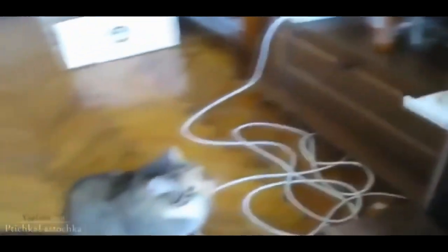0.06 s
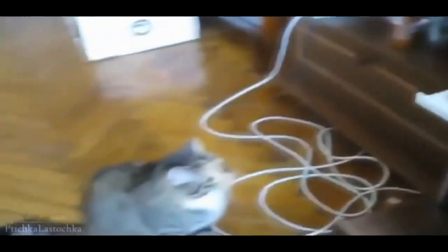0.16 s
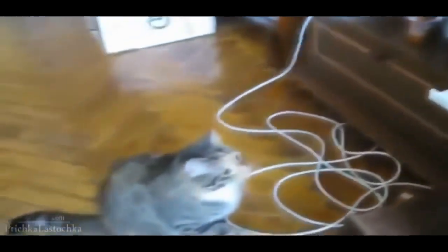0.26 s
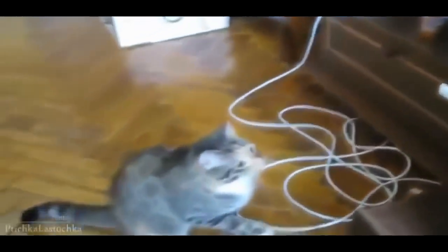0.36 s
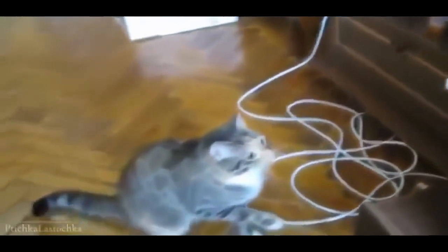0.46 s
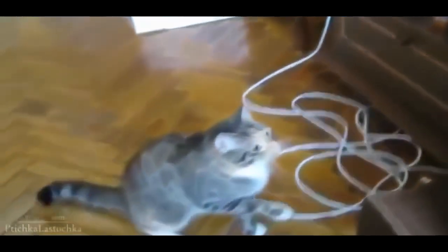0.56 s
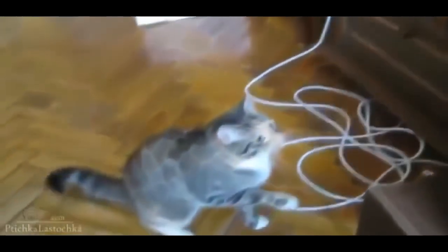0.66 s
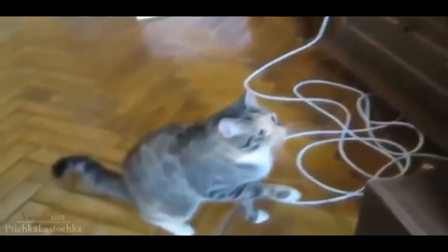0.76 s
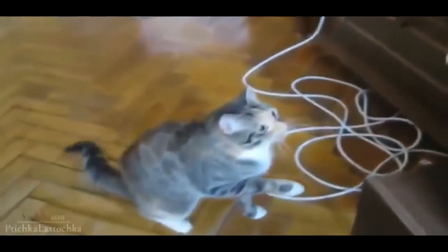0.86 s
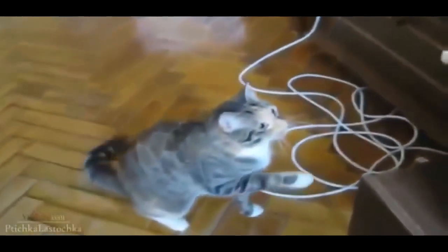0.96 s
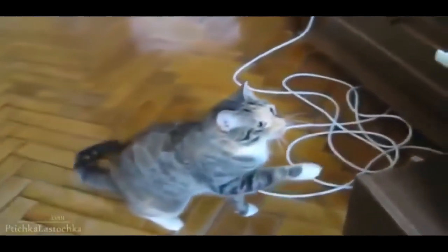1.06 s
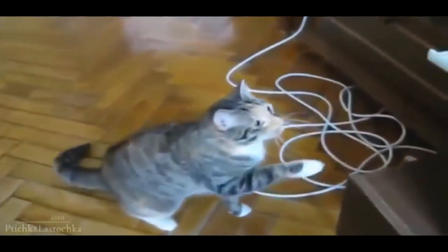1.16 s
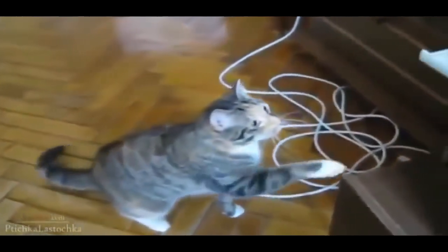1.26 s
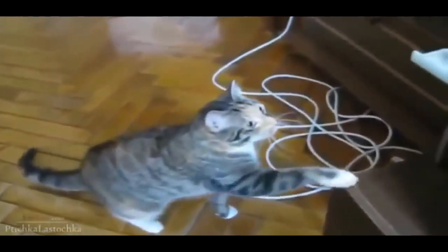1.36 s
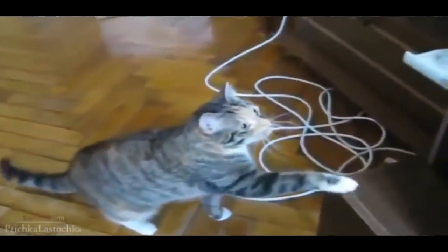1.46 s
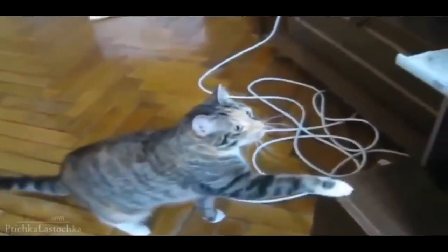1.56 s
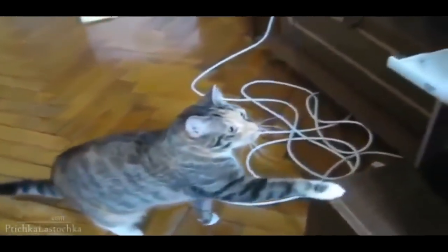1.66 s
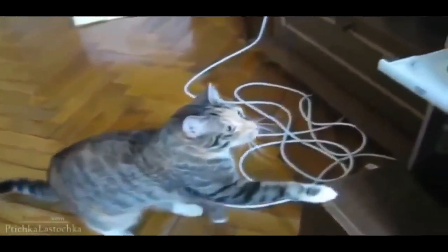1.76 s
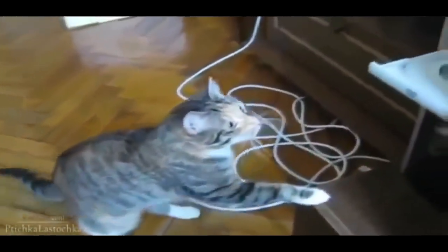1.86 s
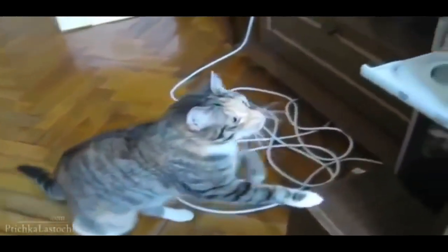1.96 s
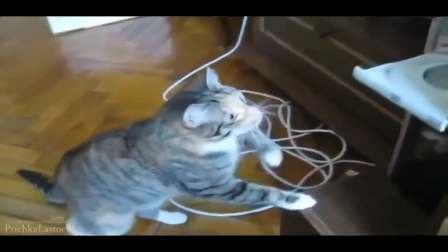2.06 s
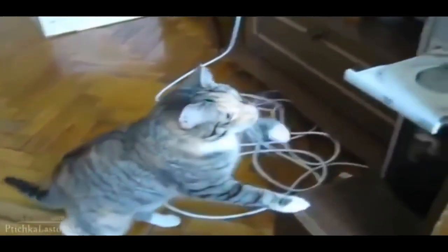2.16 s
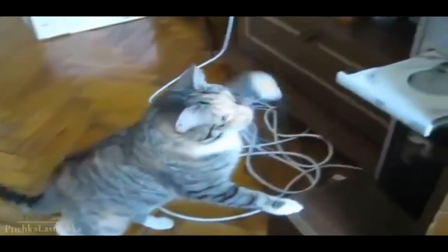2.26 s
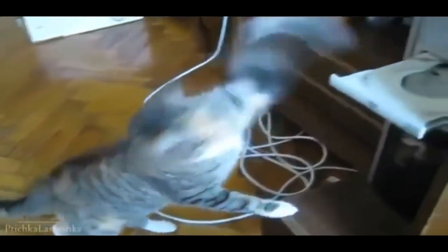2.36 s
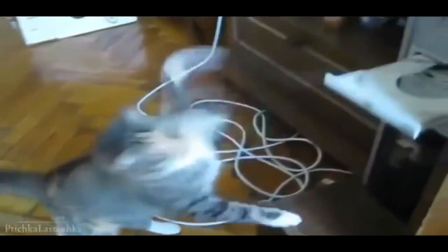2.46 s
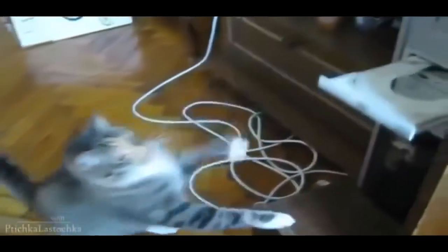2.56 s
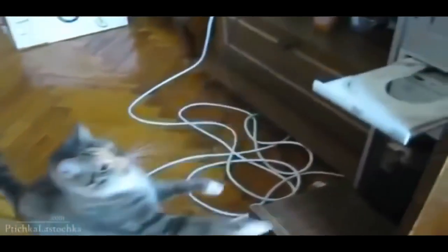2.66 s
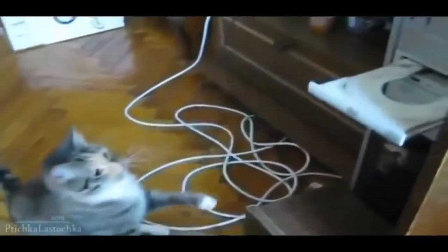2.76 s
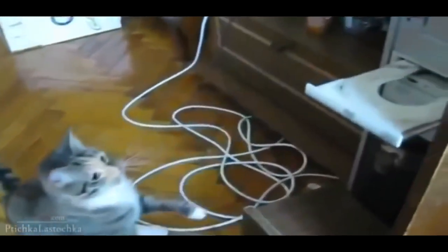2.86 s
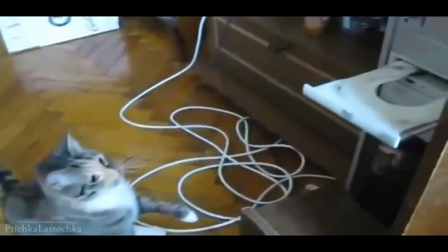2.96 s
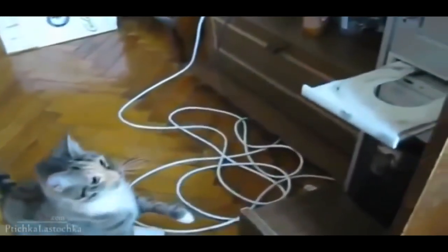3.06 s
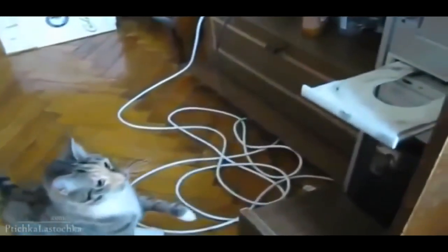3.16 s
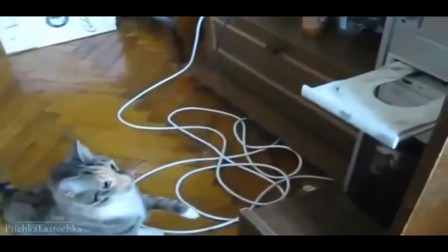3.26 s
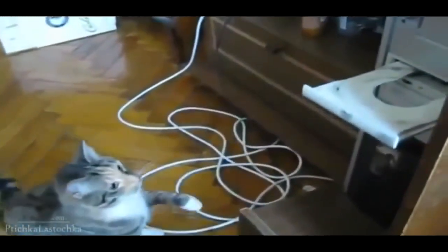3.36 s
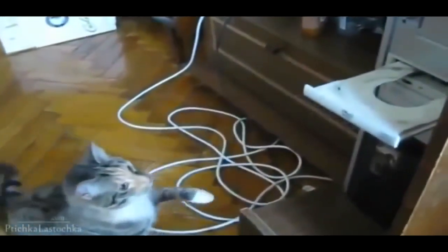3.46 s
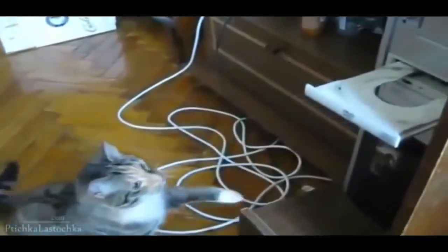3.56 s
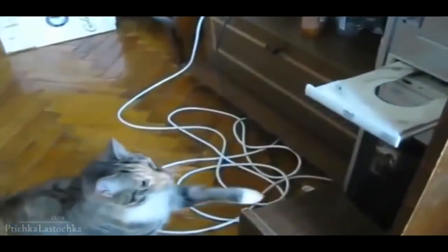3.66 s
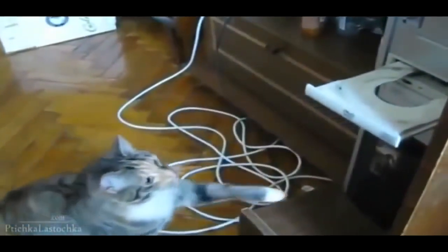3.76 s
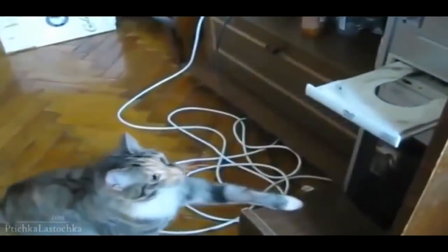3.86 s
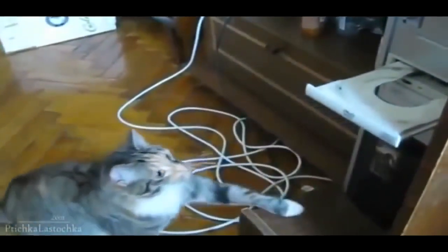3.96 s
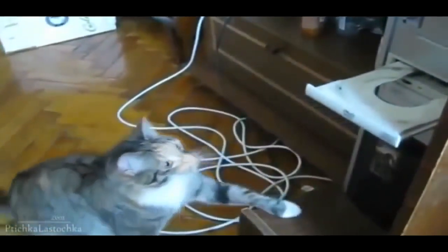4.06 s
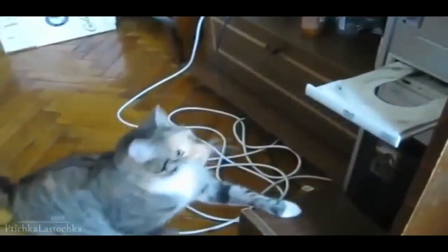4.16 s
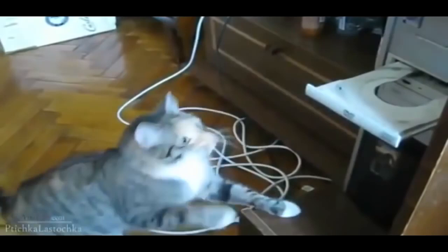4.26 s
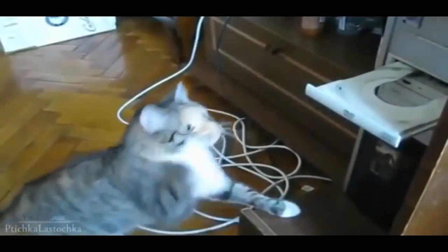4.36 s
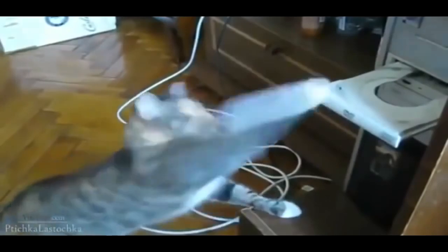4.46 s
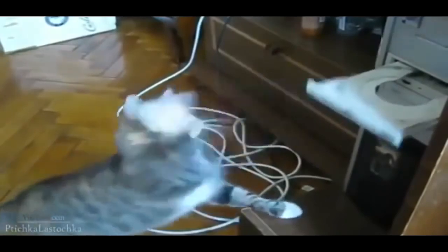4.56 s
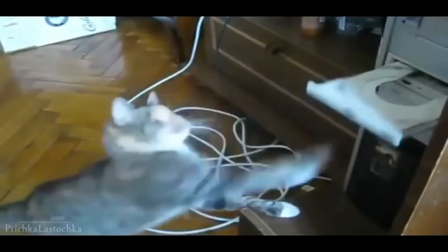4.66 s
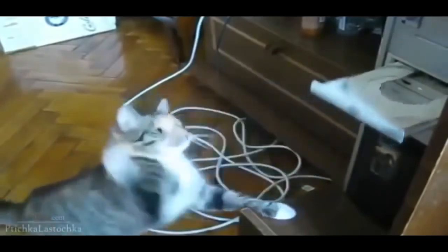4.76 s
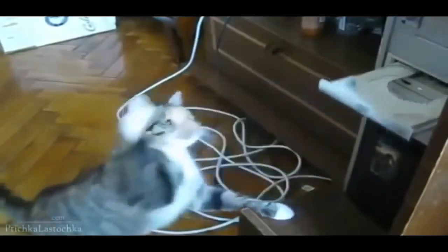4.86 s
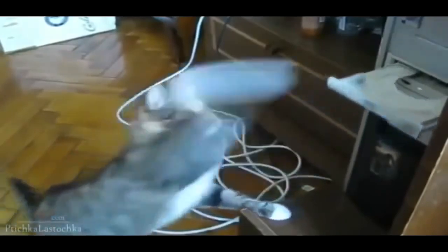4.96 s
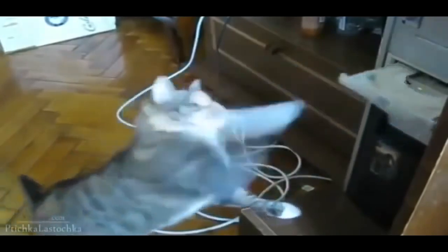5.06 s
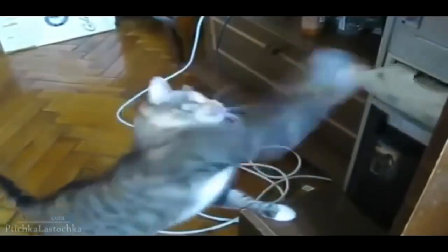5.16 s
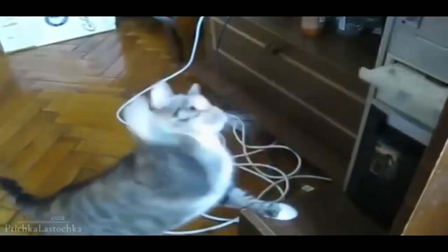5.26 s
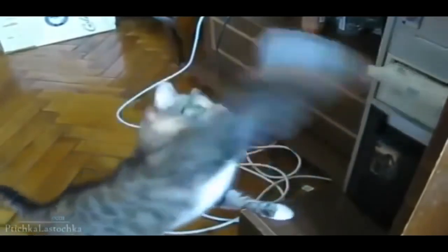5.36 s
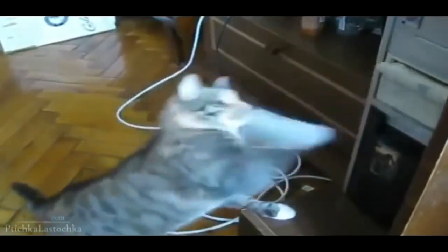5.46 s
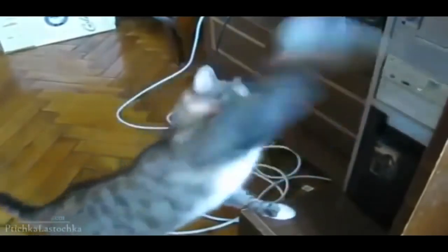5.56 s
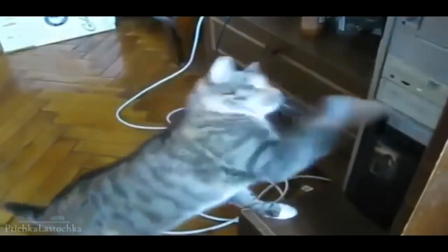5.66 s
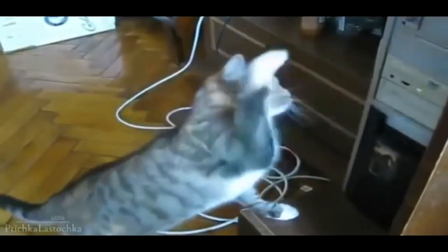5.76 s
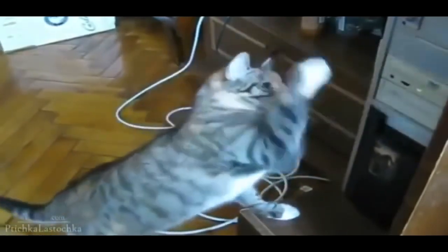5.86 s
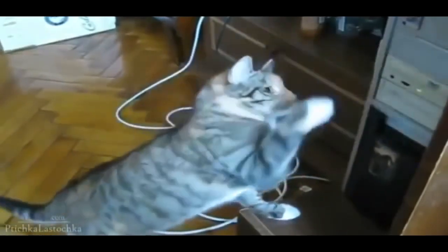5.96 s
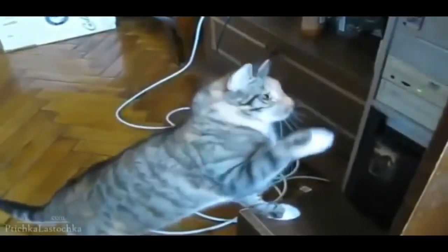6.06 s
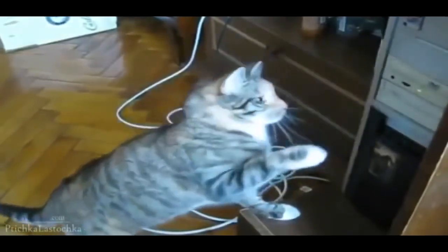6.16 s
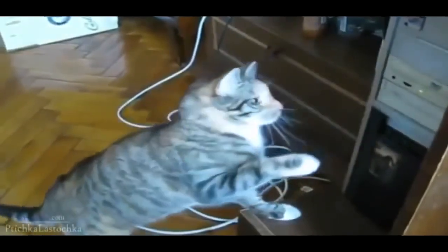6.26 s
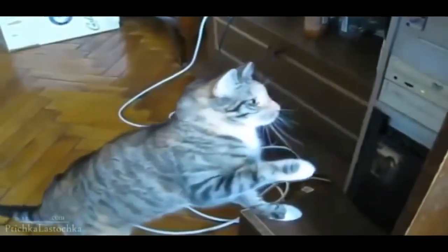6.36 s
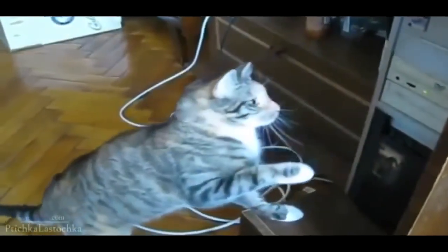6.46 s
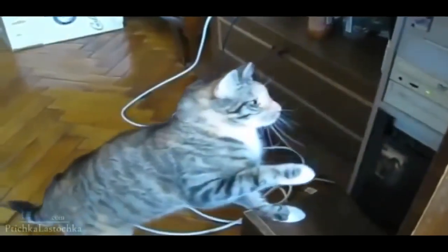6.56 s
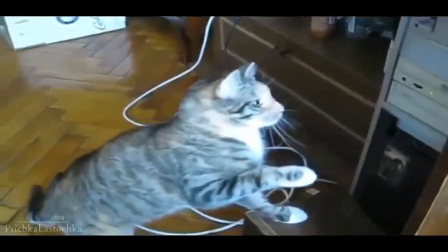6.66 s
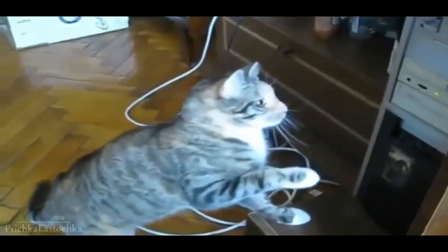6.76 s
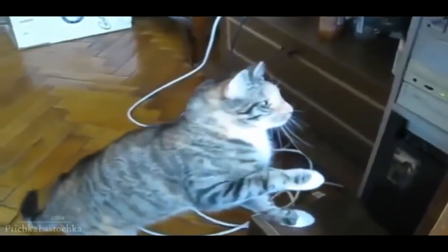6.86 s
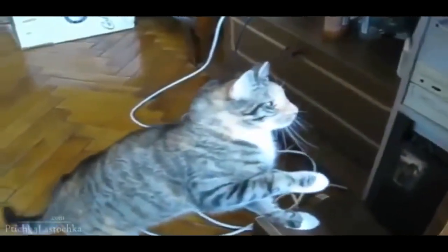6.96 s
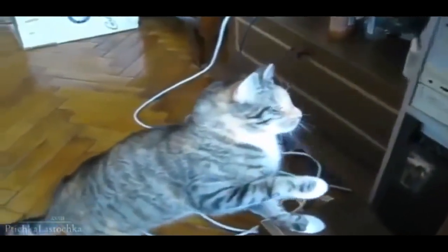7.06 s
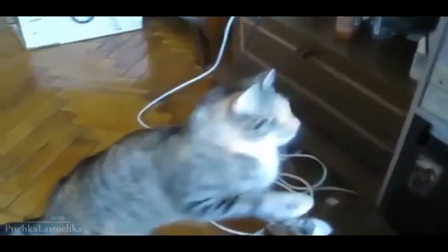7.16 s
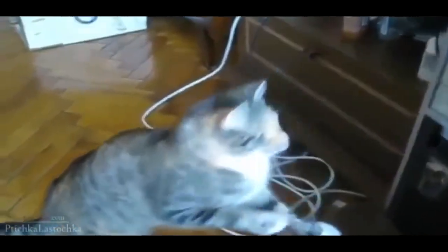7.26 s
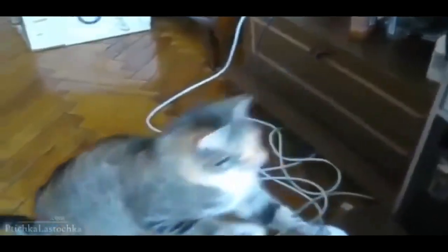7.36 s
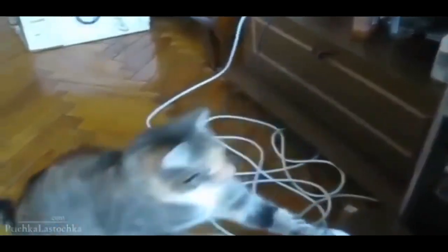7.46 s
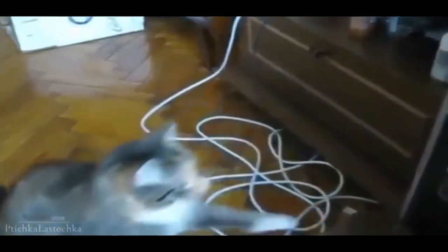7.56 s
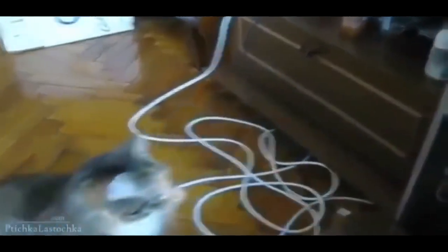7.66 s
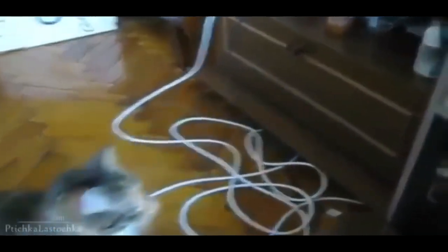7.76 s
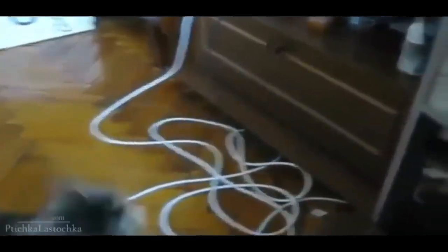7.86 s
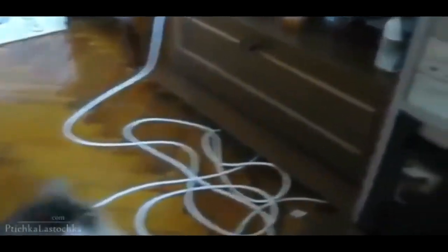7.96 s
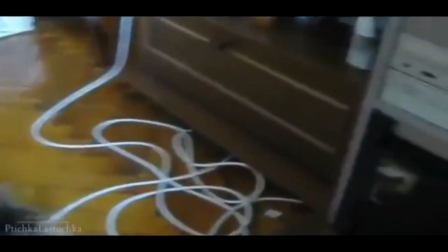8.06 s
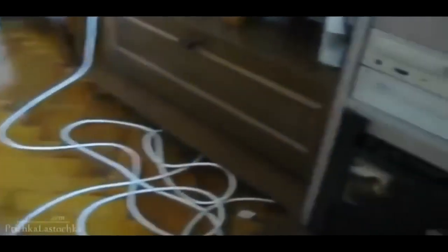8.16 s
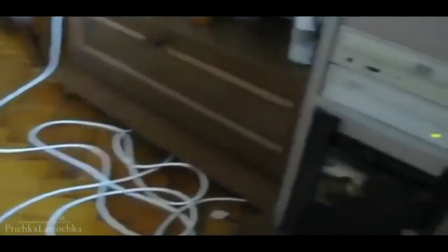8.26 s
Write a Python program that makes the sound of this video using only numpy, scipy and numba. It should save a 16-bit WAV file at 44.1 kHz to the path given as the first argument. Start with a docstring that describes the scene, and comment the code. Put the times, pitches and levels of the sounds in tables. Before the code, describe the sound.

A small room with a hard floor, heard through one limited camera microphone with slight hiss. From 0 to 0.5 s a disc-tray motor scrapes and whines, one tone sinking while another climbs, then stops. Steady computer fan hum with airy, hollow, wavering tones continues alone. At 2.8 s a hard, bright plastic clack rings out, with a low floor rumble dying away and softer taps and tiny rattles until about 3.25 s. Quiet hum again, with a small electric pop at 4.64 s. From 4.88 to 6.0 s a cat's blows batter the tray: sharp cracks at 4.88, 5.02, 5.4, 5.57, 5.79 and 5.99 s, loose rattling between them, the last duller. Grainy, roomy noise swells after the hard hits, which overload slightly. Then the fan hum returns with a changed, quieter tone; very faint ticks come near 7 and 7.7 s, and the motor scrape gently rises until 8.3 s.

```python
"""Cat and disc-drive tray

A small hard-floored room, one camera microphone. A cat swats the plastic tray of a computer's disc drive:
damped modes ring and loose contacts rattle. Grainy swells of noise follow the hard blows, mostly the room's
echo coming back as the camera's limiter releases. Filtered noise and blade tones make the fans' steady hum;
the tray motor scrapes and whines at first and stirs at the end. An electric pop crosses the line.
The camera's slow converter leaves a faint mirror of the sound above half its sampling rate."""
import sys
import numpy as np
from scipy import signal
from scipy.fft import rfft, irfft, next_fast_len
from scipy.io import wavfile
from scipy.ndimage import uniform_filter1d, map_coordinates
from numba import njit

SR = 44100
rng = np.random.default_rng(int(sys.argv[2]) if len(sys.argv) > 2 else 0)


def makeup_ratio(level_db):
    """Linear amplitude ratio for a level in decibels (20 dB per factor of ten)."""
    decades = np.asarray(level_db, float) / 20
    return 10 ** decades


def persist_wave(psi):
    """Save psi, clipped to +-1, as 16-bit WAV."""
    counts = np.round(np.clip(psi, -1, 1) * 32767).astype(np.int16)
    wavfile.write(sys.argv[1], SR, np.atleast_2d(counts).T)


N = 366471  # samples

# Source levels are ahead of the microphone and limiter; relative_db is shifted or normalised further on.
# tray motor and gears, running out, then stirring at the end: start_s, level_db (rms)
MOTOR_LEVEL = [(0, -38.5), (.2, -43), (.48, -41.5), (.52, -49), (1, -66.5), (7.3, -57), (8.31, -48)]
# colour of the gear scrape: frequency_hz, relative_db (per Hz)
GEAR_COLOUR = [(150, -36), (500, 7.5), (1200, 0.5), (2000, 1), (3000, 4), (4200, 1), (5800, -2),
               (7000, -4.5), (7900, -18)]
# gear mesh tone: time_s, pitch_hz, relative_db
MESH_WHINE = [(0, 3040, -48), (.3, 2985, -49.5), (.4, 2840, -50), (.48, 2620, -51), (.52, 2550, -80)]
# tones riding with the mesh: pitch_ratio, relative_db
MESH_PARTIALS = [(1, 1), (.4, -8)]
# tones of the second, climbing whine: pitch_ratio, relative_db
SECOND_PARTIALS = [(1, -3), (1.46, -8)]
# colour of the fans' air rush: frequency_hz, relative_db (per Hz)
FAN_COLOUR = [(12, -43), (20, 12.5), (65, 8), (571, -4.5), (919, -2.5), (1020, -7), (1210, -1), (1370, -6),
              (2260, -9.5), (2500, -11), (4560, -17), (6800, -22.5), (7900, -35.5), (10300, -67.5),
              (17400, -120)]
# course of the fans' air noise: time_s, relative_db
FAN_LEVEL = [(0, -46.5), (.62, -47.5), (4, -48), (6.6, -48), (8.31, -46.5)]
# hollows of the computer case, tray open, before a fifth power: centre_hz, width_hz, relative_db
CASE_OPEN = [(940, 14, 3), (1150, 79, 7.5), (1665, 230, 8.5), (2252, 190, 9), (4570, 120, -21)]
# the same with the tray closed: centre_hz, width_hz, relative_db
CASE_SHUT = [(814, 13, 6), (1672, 170, 3.5), (2245, 230, 3.5), (2930, 70, -3.5), (4520, 130, -15)]
# fan blade tones with the tray open: pitch_hz, level_db (rms, about which it wanders)
BLADE_TONES = [(839.8, -61.5), (931.3, -58), (1222, -59.5), (1733, -63), (2283, -83), (4527, -72.5)]
# blows and clacks of the tray: start_s, relative_db, brightest_hz, rise_s (time constant)
KNOCKS = [(2.7974, 16.5, 4440, 0.00027), (2.8485, -23, 3860, .0012), (2.892, -9.5, 4450, 0.0067),
          (2.9457, -5.5, 3860, .0008), (3.0018, -12, 4730, 0.00072), (3.064, -22.5, 4080, .0013),
          (3.1129, -28.5, 3850, .0005), (4.883, 11.5, 4300, 0.00013), (5.001, 0.5, 3700, 0.0016),
          (5.0178, 21, 4500, 0.00011), (5.1118, -10.5, 3480, 0.0015), (5.155, -0.5, 4540, 0.00053),
          (5.201, -5, 3700, 0.00039), (5.2844, -12, 3300, 0.00056), (5.356, -12.5, 3360, 0.0014),
          (5.404, 16, 3660, 0.00023), (5.5694, 13.5, 3950, 0.00045), (5.587, 6, 3180, 0.0021),
          (5.7862, 16.5, 3470, 0.000061), (5.8, -12, 2620, .0025), (5.967, -6, 764, .0005),
          (5.9917, 16.5, 1620, 0.000043), (6.012, 4.5, 2980, 0.00059), (6.965, -33, 1950, 0.0034),
          (7.731, -32, 1910, 0.0068)]
# runs of loose-tray contacts: first_s, last_s, gap_s, first_relative_db, loss_db (a contact; negative grows)
RATTLES = [(3.152, 3.25, 0.04, -28.5, 1.5), (4.9077, 4.94, 0.024, 4.5, -2.5),
           (5.261, 5.35, .0208, -19.5, -0.9)]
# heavily damped plastic tray modes: pitch_hz, relative_db, t60_s
TRAY_MODES = [(560, -4, .014), (1050, -4, .009), (1750, -5, .006), (2300, -3, .005), (3100, -1, .004),
              (3850, 0, .0035), (4500, 0, .0035), (5250, -4, .0035), (6300, -5, .0035), (7200, -8, .0035)]
# decay of the room's echo: frequency_hz, t60_s
ROOM_DECAY = [(150, 0.62), (500, 0.62), (1500, 0.45), (4000, 0.48), (7500, 0.21)]
# hollow furniture that colours the echo: centre_hz, width_hz, boost_db
FURNITURE = [(254, 94, 12), (570, 250, 8.5), (1090, 97, 6), (1785, 170, 5)]
# grainy swells of noise after the hard blows: start_s, hold_s, level_db (at the start)
SWELLS = [(4.888, 0.19, -13.5), (5.03, 0.14, -19.5), (5.412, 0.13, -5.5), (5.572, 0.19, -13.5),
          (5.792, .13, -10), (5.991, 0.055, -8)]
# colour of the swells: frequency_hz, relative_db (per Hz)
SWELL_COLOUR = [(150, -2), (500, -2.5), (1100, -2.5), (2000, -1), (3300, 0.5), (4800, -6.5), (6500, -9),
                (7900, -25.5)]
# microphone response up to half the converter's sampling rate: frequency_hz, gain_db
MIC_RESPONSE = [(30, -20), (200, -7), (1000, -1), (4000, 0), (6500, 0), (7300, -0.5), (7750, -5),
                (8000, -25)]
# strength of the converter's mirror: frequency_hz, gain_db
MIRROR_GAIN = [(8000, 2), (9000, -4), (10500, -18), (12000, -31), (13500, -26), (15000, -55), (16000, -70)]
# colour of the treble hiss: frequency_hz, relative_db (per Hz)
HISS_COLOUR = [(8000, -9), (8600, -3), (10000, 2.5), (12000, -1), (14500, -9), (15000, -8), (15300, -30),
               (16500, -86)]

SAMPLING_HZ = 16000  # the camera's converter
RATTLE_HZ = 3700  # brightness of a rattle contact, also the reference for the echo's share


def unit(x):
    """Scaled to rms 1."""
    return x / np.sqrt(np.mean(x ** 2) + 1e-20)


def along(points, hz):
    """Interpolates (Hz, value) points on a log frequency axis."""
    f, v = np.transpose(points)
    return np.interp(np.log(hz + 1), np.log(f + 1), v)


def curves(rows):
    """One value per sample for each column after the time."""
    s, *columns = np.transpose(rows)
    return [np.interp(np.arange(N) / SR, s, column) for column in columns]


def wobble(rate):
    """A smooth random curve with rate knots a second."""
    knots = rng.standard_normal(int(N * rate / SR) + 4)
    return map_coordinates(knots, [np.arange(N) * rate / SR])


def filtered(x, response):
    """x through a complex response of frequency."""
    m = next_fast_len(len(x) + 8192)
    return irfft(rfft(x, m) * response(np.fft.rfftfreq(m, 1 / SR)), m)[:len(x)]


def noise(response):
    """Coloured noise of rms 1."""
    return unit(filtered(rng.standard_normal(N), response))


def motor():
    """Gear teeth scrape unevenly; the mesh whine sinks as the motor slows while a second whine climbs."""
    waver_hz, flutter_db = 34, 3.5  # random unsteadiness of the whines
    second_hz, second_rise_hz_per_s, second_from_s = 3520, 700, .16

    def tone(hz, db):
        level = makeup_ratio(tone_db + db + flutter_db * wobble(30))
        return level * np.sin(2 * np.pi * np.cumsum(hz + waver_hz * wobble(80)) / SR)

    level_db, = curves(MOTOR_LEVEL)
    teeth = makeup_ratio(1.4 * wobble(120) + .8 * wobble(15))
    mesh_hz, tone_db = curves(MESH_WHINE)
    mesh = sum(tone(ratio * mesh_hz, db) for ratio, db in MESH_PARTIALS)
    since = np.arange(N) / SR - second_from_s
    climbing_hz = second_hz + second_rise_hz_per_s * np.clip(since, 0, 1) + 2 * waver_hz * wobble(12)
    second = sum(tone(ratio * climbing_hz, db) for ratio, db in SECOND_PARTIALS) * (since > 0)
    scrape = unit(teeth * noise(lambda f: makeup_ratio(along(GEAR_COLOUR, f))))
    return makeup_ratio(level_db) * scrape + mesh + second


def hollows(peaks):
    """Air noise ringing in the hollows of the case: summed resonances, sharpened by a fifth power."""
    def response(f):
        return sum(makeup_ratio(db) * f * w / np.hypot(c * c - f * f, f * w) for c, w, db in peaks) ** 5.0
    return noise(response)


def fans():
    """Air rush, its ringing in the case and unsteady blade tones; closing the tray shifts the balance."""
    level_db, = curves(FAN_LEVEL)
    t = np.arange(N) / SR
    shut = t > 6  # s
    case = np.where(shut, makeup_ratio(-8.5) * hollows(CASE_SHUT), makeup_ratio(-11.5) * hollows(CASE_OPEN))
    tones = 0
    for hz, db in BLADE_TONES:
        level = makeup_ratio(db + 3 + 1.9 * wobble(5.5))  # 3 dB from rms to peak
        tones = tones + level * np.sin(2 * np.pi * hz * t + 1.2 * wobble(3.7))
    rush = noise(lambda f: makeup_ratio(along(FAN_COLOUR, f))) * makeup_ratio(0.077 * wobble(3.7))
    return makeup_ratio(level_db + 4.5) * (rush + case) + makeup_ratio(-6 * shut) * tones


def contacts():
    """Every touch of the tray: the single knocks, then the rattles spelled out."""
    rise_s, jitter_s = 0.00055, 0.0011
    rows = list(KNOCKS)
    for first, last, gap, db, loss_db in RATTLES:
        for k, s in enumerate(np.arange(first, last, gap)):
            rows.append((s + jitter_s * rng.standard_normal(), db - loss_db * k, RATTLE_HZ, rise_s))
    return rows


def ringing(t, hz):
    """The tray's answer to one tap: the modes nearest hz sound most."""
    modes = np.array(TRAY_MODES)
    # the modes move with the spot struck and how far the tray is out
    pitch = modes[:, :1] * (1 + .04 * rng.standard_normal((len(modes), 1)))
    uneven_db = 1.5 * rng.standard_normal(len(modes))
    weight = makeup_ratio(modes[:, 1] + uneven_db - 10 * np.log2(modes[:, 0] / hz) ** 2)
    soft = 1 - np.exp(-(t * hz / 0.69) ** 2)  # a duller tap is a longer, softer contact
    return soft * (weight @ (makeup_ratio(-60 * t / modes[:, 2:]) * np.sin(2 * np.pi * pitch * t)))


def echo():
    """A fresh diffuse tail of energy 1, each frequency dying at its own speed."""
    hz, t, z = signal.stft(rng.standard_normal(SR * 3 // 4), SR, nperseg=256)
    decay = makeup_ratio(-60 * t / along(ROOM_DECAY, hz)[:, None])
    tail = signal.istft(z * decay, SR, nperseg=256)[1]
    # the echo takes a few wall trips to build up
    tail = tail * (1 - np.exp(-np.arange(len(tail)) / SR / 0.0076))
    return tail / np.linalg.norm(tail)


def walls(f, hz, thump_db):
    """The walls hear the tray from all sides, so its modes blend into one broad colour on a low shelf."""
    octaves = np.log2((f + 1) / hz)
    slope = -6 * octaves ** 2
    blend = np.where(octaves > 0, slope, np.maximum(slope, thump_db + 13.5))
    boom = sum(db / (1 + (2 * (f - c) / w) ** 2) for c, w, db in FURNITURE)
    return makeup_ratio(blend + boom) * f / (f + 250)


def knocks():
    """Each contact chatters for a few ms, rings the tray modes nearest its brightness and fills the room."""
    out, t = np.zeros(N + 2 * SR), np.arange(SR // 10) / SR
    for s, db, hz, rise in contacts():
        t60 = 0.0205 + 6 * rise  # s; a softer contact chatters longer
        thump_db = min(-11.5 - 0.41 * db, -2)  # hard blows ring more than they thump
        # duller knocks come from inside the case and are heard more from the walls
        echo_db = -3 + 2.5 * min(np.log2(RATTLE_HZ / hz), 1)
        decay = makeup_ratio(-60 * t / t60) + 0.084 * makeup_ratio(-60 * t / 0.092)
        shape = decay * (1 - np.exp(-t / rise)) ** 2
        chatter = shape * rng.standard_normal(len(t))
        body = signal.fftconvolve(chatter, ringing(t, hz))[:len(t)]
        body = body * np.linalg.norm(shape) / np.linalg.norm(body) / shape.max()
        lurch = (t / 0.00072) * np.exp(1 - t / 0.0007)  # the whole tray jolts
        hit = makeup_ratio(db - 11.5) * (body + makeup_ratio(thump_db) * lurch)
        tail = filtered(echo(), lambda f: walls(f, hz, thump_db))
        wet = makeup_ratio(echo_db) * np.linalg.norm(hit) * tail
        start = round(s * SR)
        out[start:][:len(hit)] += hit
        out[start:][:len(wet)] += wet
    return out[:N]


def rumble():
    """Low noise through the floor as the cat springs back: it sets in quickly and dies away."""
    start_s, level_db, corner_hz, t60_s = 2.8, -28, 110, 1.2
    t = np.maximum(np.arange(N) / SR - start_s, 0)
    shape = makeup_ratio(level_db - 60 * t / t60_s) * (1 - np.exp(-t / 0.024))
    return shape * noise(lambda f: 1 / (1 + (f / corner_hz) ** 4))


def pop():
    """A spike in the microphone line; coupling capacitors turn its area into a shallow undershoot."""
    start_s, level_db, rise_s, fall_s = 4.63545, -2, .00009, .00028  # level ahead of the capacitors
    t = np.arange(N) / SR - start_s
    spike = np.exp(np.where(t < 0, t / rise_s, -t / fall_s))
    # two high-passes, at 100 and 40 Hz
    return makeup_ratio(level_db) * filtered(spike, lambda f: 1j * f / (100 + 1j * f) * 1j * f / (40 + 1j * f))


def swells():
    """Grainy noise after the hard blows, mostly the room's echo coming back as the limiter releases."""
    rise_db_per_s, sag_db_per_s, fall_db_per_s = 4000, 89.5, 280
    t = np.arange(N) / SR
    level = 0
    for s, hold, db in SWELLS:
        rise_db = rise_db_per_s * np.minimum(t - s, 0)
        sag_db = sag_db_per_s * np.clip(t - s, 0, hold)
        fall_db = fall_db_per_s * np.maximum(t - s - hold, 0)
        level = level + makeup_ratio(db + rise_db - sag_db - fall_db)
    chance, size = rng.random((2, N))
    # about 12000 grains a second, of random size and sign
    grains = (chance < 12000 / SR) * np.log(size + 1e-9) * np.sign(rng.standard_normal(N))
    unevenness = makeup_ratio(1.43 * wobble(90) + 0.45 * wobble(22))
    return level * unit(unevenness * filtered(grains, lambda f: makeup_ratio(along(SWELL_COLOUR, f))))


def scene():
    """Everything the single microphone meets, with the swells laid in."""
    return (knocks() + swells() + rumble() + motor() + fans())[None]


@njit
def follow(x, attack, hold, release):
    """Peak follower: quick to rise, waits, then falls slowly."""
    env, now, waited = np.empty_like(x), 0., 0.
    for i in range(len(x)):
        if x[i] > now:
            now, waited = now + attack * (x[i] - now), 0.
        else:
            waited += 1
            now = now * release if waited > hold else now
        env[i] = now
    return env


def limiter(x):
    """Gain drops with the peak envelope above -9.5 dB; first peaks outrun it and overload softly."""
    # 1.13 ms attack, 33 ms hold, then the envelope falls 280 dB a second
    env = follow(np.abs(x), 1 / (SR * 0.00113), SR * 0.033, float(makeup_ratio(-280 / SR)))
    held = x * np.maximum(env / makeup_ratio(-9.5), 1) ** -.95
    return held / (1 + np.abs(held / .8) ** 6) ** (1 / 6)


def mirror(x):
    """The slow converter flips the sound about half its sampling rate."""
    flipped = 2 * x * np.cos(2 * np.pi * SAMPLING_HZ * np.arange(N) / SR)
    return filtered(flipped, lambda f: makeup_ratio(along(MIRROR_GAIN, f)) * (f > SAMPLING_HZ / 2) * (f < SAMPLING_HZ))


def hiss(x):
    """Treble noise above half the sampling rate: a faint floor that grows with the sound above 4250 Hz."""
    bright = filtered(x, lambda f: (f > 4250) * (f < SAMPLING_HZ / 2))
    loudness = uniform_filter1d(np.abs(bright), size=200)
    colour = noise(lambda f: makeup_ratio(along(HISS_COLOUR, f)) * (f > SAMPLING_HZ / 2))
    return (makeup_ratio(-71.5) + makeup_ratio(-12.5) * loudness) * colour


def band_limit(x):
    """A steep low-pass at the top of the band."""
    return signal.sosfilt(signal.butter(12, 16460, fs=SR, output="sos"), x)


def record(dry):
    """Limiter and overload, microphone response, pop, mirror band, hiss and full scale."""
    held = limiter(dry[0])
    x = filtered(held, lambda f: makeup_ratio(along(MIC_RESPONSE, f)) * (f < SAMPLING_HZ / 2))
    x = x + filtered(pop(), lambda f: np.clip((SAMPLING_HZ / 2 - f) / 900, 0, 1))
    x = x + mirror(x)
    x = x + hiss(x)
    x = x / (1 + np.abs(x / .93) ** 8) ** (1 / 8)  # soft full scale
    return band_limit(x[None])


dry = scene()
out = record(dry)
persist_wave(out)
```